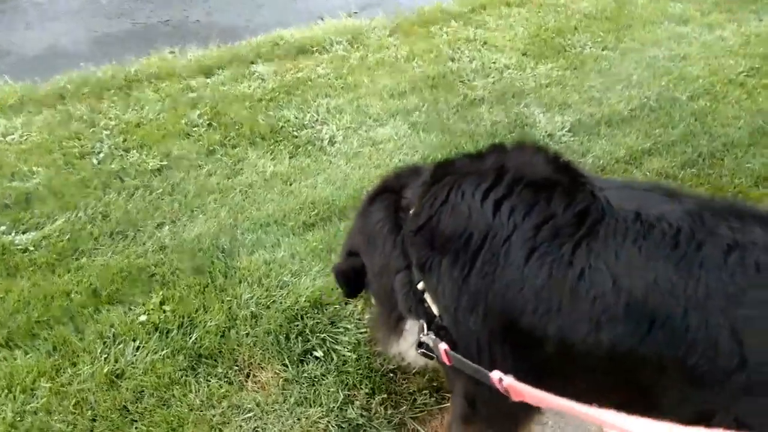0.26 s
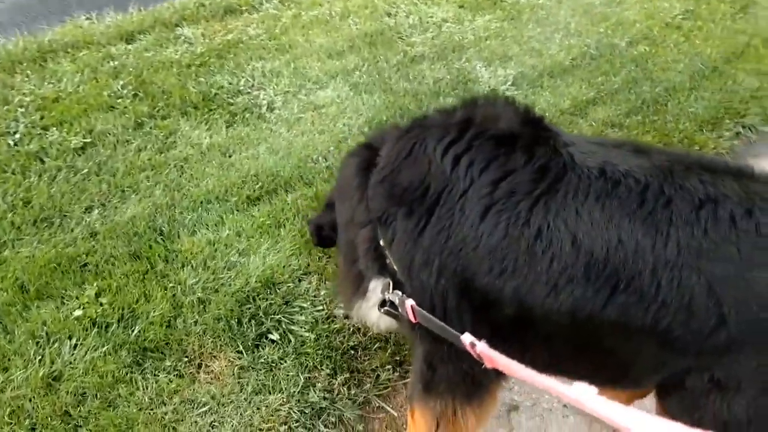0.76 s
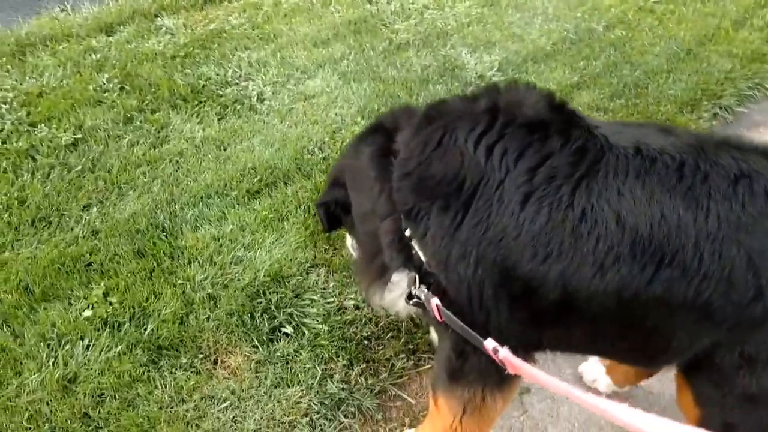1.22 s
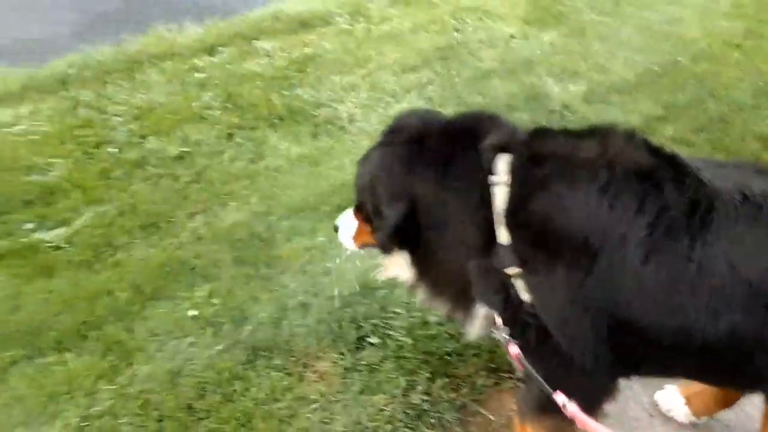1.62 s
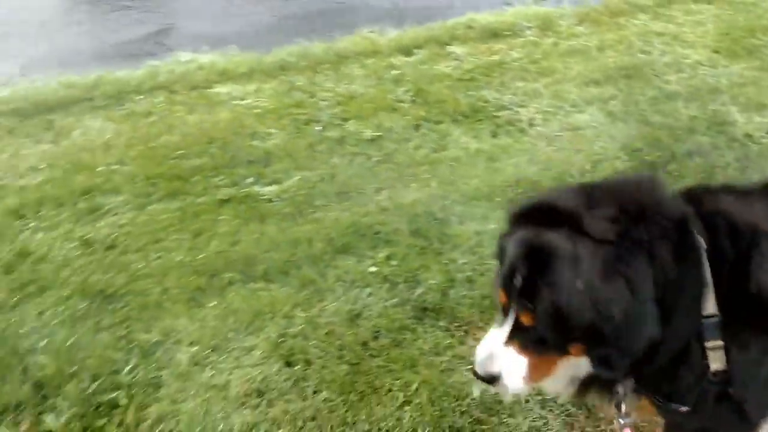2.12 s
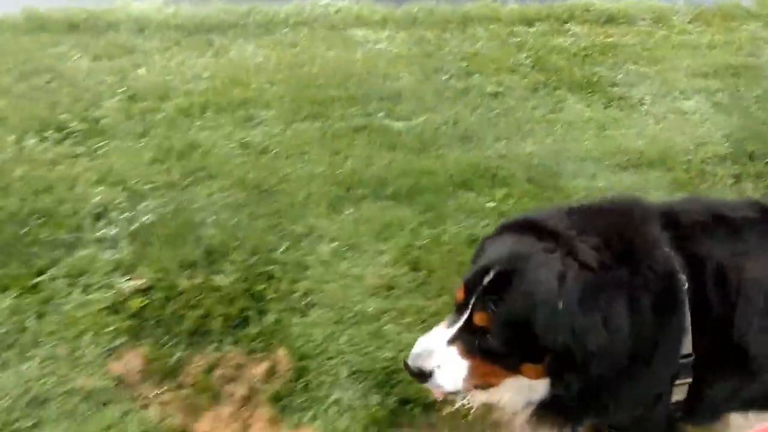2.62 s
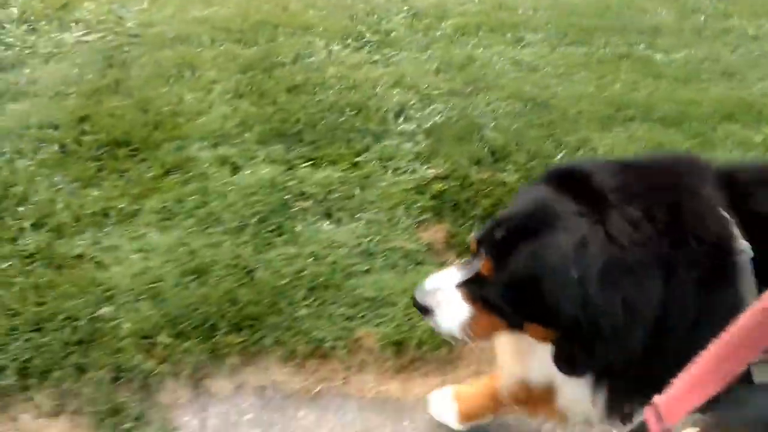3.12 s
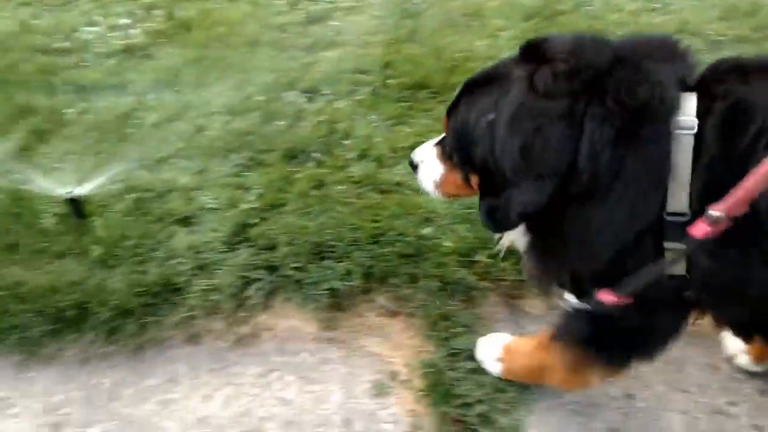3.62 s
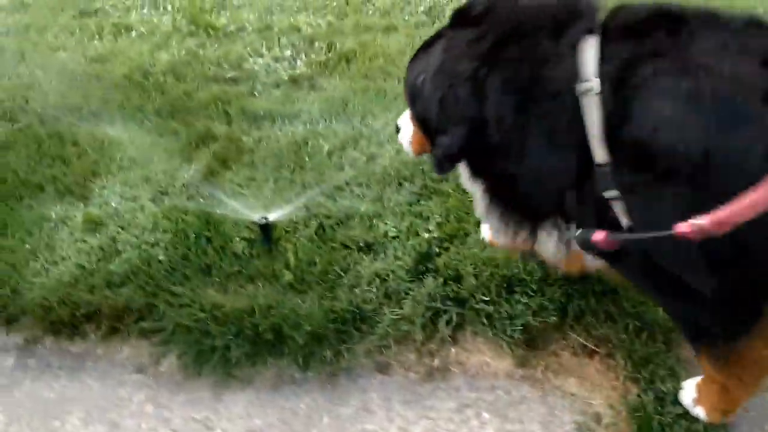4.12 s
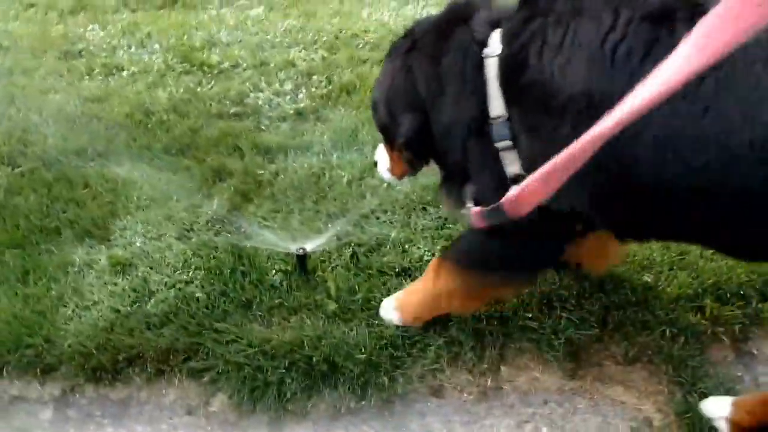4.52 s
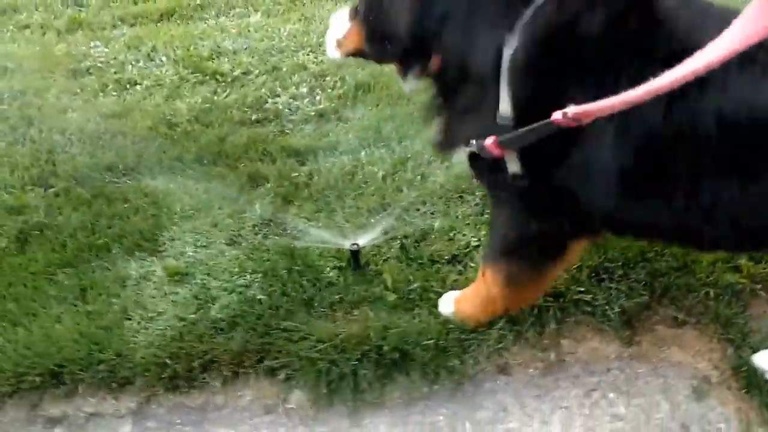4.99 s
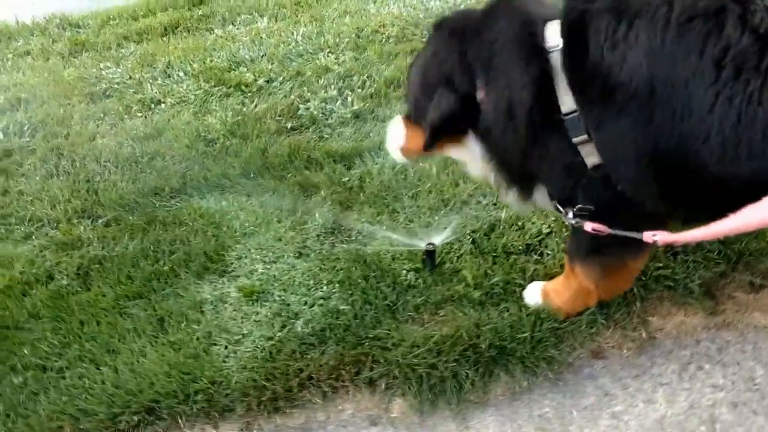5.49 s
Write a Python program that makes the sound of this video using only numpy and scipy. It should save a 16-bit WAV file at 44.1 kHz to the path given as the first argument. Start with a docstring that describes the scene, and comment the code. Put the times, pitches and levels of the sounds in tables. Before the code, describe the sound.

Outdoors on a lawn, sprinklers hiss and patter over a low, wide rumble. A dog laps and snaps at the water with wet plops, small bubbles and short splashes. The hand-held microphone moves towards one nozzle, so its hiss grows brighter and closer. Near the end the leash clip jingles and grates, a plastic buckle clacks, and a few dull paw falls land.

```python
"""Sprinklers hiss and patter on a lawn over a low outdoor rumble: filtered noise and random impulses.
A leashed dog laps and snaps at the spray: damped sines for plops, struck resonances for snaps.
The hand-held microphone nears one nozzle, so its hiss shifts in level and colour.
Near the end the leash clip clinks close by, as ringing modes and grating noise, and a buckle clacks.
Gain control ducks when the treble is loud and slowly recovers."""
import sys
import numpy as np
from scipy import signal
from scipy.fft import rfft, irfft, next_fast_len
from scipy.io import wavfile
from scipy.ndimage import uniform_filter1d, map_coordinates

SR = 44100
rng = np.random.default_rng(int(sys.argv[2]) if len(sys.argv) > 2 else 0)


def wrap_up_sound(samples):
    """Save the sound to the file named by the first command line argument, as 16-bit audio."""
    columns = np.atleast_2d(samples).T
    # keep every value between -1 and 1, then stretch to whole-number steps
    tamed = np.clip(columns, -1, 1)
    steps = np.round(tamed * 32767).astype(np.int16)
    wavfile.write(sys.argv[1], SR, steps)


N = 253575
TIME = np.arange(N) / SR  # s


def from_db(db):
    """Decibel law: amplitude gain from level."""
    return 10 ** (np.asarray(db) / 20)


def rms_one(x):
    """Power normalization: scale to rms 1."""
    return x / np.sqrt(np.mean(x ** 2) + 1e-20)


def in_time(rows):
    """Linear interpolation: each column of a curve at every sample."""
    times, *columns = np.transpose(rows)
    return [np.interp(TIME, times, column) for column in columns]


def add(out, s, sound):
    """Superposition: mix a sound in at time s."""
    start = max(round(s * SR), 0)
    out[..., start:start + sound.shape[-1]] += sound[..., :max(N - start, 0)]


def colour(x, spectrum):
    """Linear filtering: shape x by a spectrum in the frequency domain; rms 1."""
    hz, db = np.transpose(spectrum)
    size = next_fast_len(x.shape[-1])
    bins = np.maximum(np.fft.rfftfreq(size, 1 / SR), 1)
    # the response falls as f squared below the first point
    below = np.minimum(bins / hz[0], 1) ** 2
    gain = below * from_db(np.interp(np.log(bins), np.log(hz), db))
    shaped = irfft(rfft(x, size) * gain, size)
    return rms_one(shaped[..., :x.shape[-1]])


def drift(rate):
    """Slow random modulation: lines between chance knots, rate per second; rms 1."""
    knots = rng.standard_normal(2000)
    return rms_one(np.interp(TIME * rate, np.arange(len(knots)), knots))


def swell_at(s, half_s):
    """Gaussian envelope: a smooth rise and fall around time s; height 1."""
    return np.exp(-((TIME - s) / half_s) ** 2 / 2)


def approach(far, near):
    """Sigmoid transition: ease from far to near value as the microphone walks up to the nozzle."""
    middle_s, ease_s = 3.35, 0.32
    return far + (near - far) * (1 + np.tanh((TIME - middle_s) / ease_s / 2)) / 2


def resonate(x, hz, width_hz):
    """Two-pole resonance: the bandwidth sets the decay."""
    r = np.exp(-np.pi * width_hz / SR)
    return signal.lfilter([1, 0, -1], [1, -2 * r * np.cos(2 * np.pi * hz / SR), r * r], x)


def delayed(x, ms):
    """Propagation delay: read x a changing time late."""
    return map_coordinates(x, [np.arange(N) - ms * SR / 1000], order=3, mode="wrap")


def panned(x, pan_db):
    """Interchannel level difference: positive pan_db favours the left."""
    return x * from_db(np.reshape([pan_db / 2, -pan_db / 2], (2, -1)))


def left_right(mid, side):
    """Sum-difference decoding: mid and side to two channels."""
    return np.array([mid + side, mid - side])


def drops(per_s, spread_db, smooth_db):
    """Shot noise: near drops of uneven size over the smooth wash of countless far ones."""
    sizes = from_db(spread_db * np.minimum(rng.exponential(1, N), 4)) * rng.choice([-1, 1], N)
    near = rms_one(sizes * (rng.random(N) < per_s / SR))
    return rms_one(near + from_db(smooth_db) * rng.standard_normal(N))


def plop(hz, t60, rise):
    """Damped oscillation: a sine swells and dies, its pitch raised by the fraction rise; envelope height 1."""
    t = TIME[:SR // 10]
    age = t * np.log(1000) / max(t60, .002)
    pitch = hz * (1 + rise * np.minimum(t / t60, 1))
    envelope = age * np.exp(1 - age)
    return envelope * np.sin(2 * np.pi * np.cumsum(pitch) / SR)


# Rumble spectra of the channel sum and difference: [f/Hz, level/dB per Hz]
RUMBLE_SUM_SPECTRUM = [(25, -38), (38, -21), (55, -8), (85, -2.5), (160, -4), (185, 1), (220, -7),
                       (400, -10.5), (1000, -26)]
RUMBLE_DIFFERENCE_SPECTRUM = [(25, -17), (38, -10), (55, 14), (90, 0), (130, 10.5), (200, -4), (400, -3),
                              (900, -2.5)]


def rumble(mid_db=-1.0, side_db=11.5):
    """Low-frequency noise in near antiphase: steady outdoor rumble with one soft gust."""
    level_db = -52.5 + 5 * swell_at(2.95, half_s=0.38)
    mid, side = rng.standard_normal((2, N))
    mid = from_db(mid_db) * colour(mid, RUMBLE_SUM_SPECTRUM)
    side = from_db(side_db) * colour(side, RUMBLE_DIFFERENCE_SPECTRUM)
    return from_db(level_db) * left_right(mid, side)


# Drops landing on grass and soil: [f/Hz, level/dB per Hz]
PATTER_SPECTRUM = [(100, -1.5), (250, -3), (450, -1), (800, 0.5), (1200, -3.5), (1700, -6.5), (2400, -22.5),
                   (4000, -48), (9000, -16.5)]


def patter(level_db, mid_db=2.0, side_db=-5.5, flutter_db=1.23):
    """Impact noise: random drops land dully on grass and soil."""
    mid, side = (colour(drops(per_s=600, spread_db=4.0, smooth_db=2.5), PATTER_SPECTRUM) for _ in range(2))
    level = from_db(level_db + flutter_db * drift(25.024))
    return level * left_right(from_db(mid_db) * mid, from_db(side_db) * side)


# Fine spray: [f/Hz, level/dB per Hz]
MIST_SPECTRUM = [(1200, -23), (2300, -6), (3200, 5.5), (4300, 10.5), (5400, 6.5), (7500, -5), (11000, -19),
                 (13300, 0), (15500, 0)]


def mist(level_db, mid_db=5.5, side_db=-4.5, flutter_db=2.5):
    """Dense shot noise: fine spray from the heads all around."""
    mid, side = (colour(drops(per_s=3000, spread_db=2.0, smooth_db=4.5), MIST_SPECTRUM) for _ in range(2))
    level = from_db(level_db + flutter_db * drift(40))
    return level * left_right(from_db(mid_db) * mid, from_db(side_db) * side)


# Hiss level of the near nozzle: [t/s, level/dB]
NOZZLE_LEVEL = [(0.0, -43.5), (0.52, -41.5), (1.03, -45.5), (1.47, -40.5), (1.9, -42.5), (3.31, -39.5),
                (4.11, -37), (4.59, -36.5), (4.7, -37)]
# Hiss of the tearing water sheet: [f/Hz, level/dB per Hz]
NOZZLE_SPECTRUM = [(3000, 0), (6000, 1.5), (7600, 5), (9000, 2), (11500, 1.5), (15500, -2.5)]
# Bright bands that swell and fade as the microphone moves, relative to the hiss:
# [t at height/s, half length/s, f at height/Hz, slide/(Hz/s), width/Hz, level/dB, left-right/dB]
BRIGHT_BANDS = [(0.502, .6, 13400, 103, 1100, -18, -5), (1.5, 2.1, 9740, -79, 900, -19.5, 17),
                (2.1, 0.34, 13200, -1200, 900, -13, -10), (2.503, 0.46, 11750, -250, 800, -7, -2),
                (3.151, 0.47, 13950, -400, 1400, -7, 0), (3.344, 0.38, 11270, -900, 750, -6.5, 4),
                (3.7, 0.32, 9440, -600, 1100, -9.5, -6), (4.25, 0.39, 7940, -400, 850, -5.5, 10),
                (4.399, .35, 11040, 49.5, 700, -11.5, -9), (4.6, 0.42, 12850, 300.5, 1000, -9.5, -11),
                (5.199, 0.55, 8200, 50.5, 850, -15.5, 16)]


def nozzle(scatter_db=-2.5, flutter_db=.5, patchy_db=3.0, wander_hz=120):
    """Jet breakup noise: a water sheet tears into drops; patchy bright bands come and go in its hiss."""
    level_db, = in_time(NOZZLE_LEVEL)
    # the left port leads until the nozzle is in front
    lead_ms = approach(far=0.407, near=0)
    tearing = drops(per_s=10000, spread_db=6.5, smooth_db=-3.5)
    ports = np.array([tearing, delayed(tearing, lead_ms)])
    ports = ports + from_db(scatter_db) * rng.standard_normal((2, N))
    hiss = panned(colour(ports, NOZZLE_SPECTRUM), approach(far=10, near=1))
    for s, half_s, hz, slide, width_hz, db, pan_db in BRIGHT_BANDS:
        # low-passed noise on two quadrature carriers makes a gliding noise band
        narrow = signal.butter(2, width_hz / 2, fs=SR, output="sos")
        centre_hz = hz + slide * (TIME - s) + wander_hz * drift(6.5)
        phase = 2 * np.pi * np.cumsum(centre_hz) / SR
        a, b = signal.sosfilt(narrow, rng.standard_normal((2, 2, N)))
        band = rms_one(a * np.cos(phase) + b * np.sin(phase))
        band_level = from_db(db + patchy_db * drift(11)) * swell_at(s, half_s)
        hiss = hiss + panned(band_level * band, pan_db)
    return hiss * from_db(level_db + flutter_db * drift(40))


def close_patter(far_db=-66, near_db=-48.5, hz=1230, width_hz=700, side_db=-6, pan_db=3.0):
    """Resonant impacts: drops tick on blades near the head, louder as the microphone comes closer."""
    ticks = (resonate(drops(per_s=770, spread_db=6.5, smooth_db=-1.5), hz, width_hz) for _ in range(2))
    mid, side = (rms_one(resonate(x, hz, width_hz)) for x in ticks)
    return from_db(approach(far_db, near_db)) * panned(left_right(mid, from_db(side_db) * side), pan_db)


# Soft paw falls on wet turf: [t/s, peak level/dB, f/Hz]
PAW_FALLS = [(0.106, -36.5, 302), (3.658, -36, 380), (4.389, -32.5, 350), (4.918, -31, 306),
             (5.019, -31, 298), (5.121, -29, 254)]


def steps(ring_cycles=3.5):
    """Heavily damped impact: each paw lands with a short, dull pat."""
    out = np.zeros((2, N))
    for s, db, hz in PAW_FALLS:
        add(out, s, from_db(db) * plop(hz, ring_cycles / hz, rise=0))
    return out


# Tongue and jaw in the water:
# [t/s, plop level/dB, plop f/Hz, ring/cycles, snap level/dB, snap centre f/Hz]
TONGUE_AND_JAW = [(.371, -38, 600, 9.9, -51, 1500), (.427, -40, 920, 27, -45, 1500),
                  (.469, -36, 1100, 18, -33, 1500), (.483, -38, 1090, 18, -42, 1500),
                  (.642, -30.5, 530, 6.7, -44, 1500), (.671, -46, 830, 12, -44, 1500),
                  (.754, -32.5, 654, 10.5, -38, 1500), (.993, -34, 760, 12, -25.5, 1500),
                  (1.043, -24.5, 710, 9.5, -39, 1500), (1.071, -48, 1500, 4, -27, 3300),
                  (1.172, -25, 800, 2, -21.5, 1500), (1.21, -21, 1410, 3.8, -21.5, 1500),
                  (1.271, -33.5, 427, 7.6, -22, 1500), (1.335, -33, 320, 3.4, -38, 1500),
                  (1.472, -37, 1820, 14, -35, 1700), (1.548, -37, 1210, 16, -32, 1500),
                  (1.7015, -17.5, 883, 11, -27, 1500), (2.017, -36, 2760, 26, -33, 2800),
                  (2.033, -27.5, 1130, 10.4, -21, 1600), (2.039, -34, 990, 10, -28, 1700),
                  (2.163, -17.5, 626, 1.45, -26, 2900), (2.375, -29.5, 1420, 31, -24, 1800),
                  (2.631, -25, 485, 7.4, -26.5, 1500), (2.705, -27.5, 513, 8.6, -48, 1500),
                  (2.752, -31, 377, 6.5, -44, 1500), (2.795, -29.5, 840, 6.9, -26, 1500),
                  (3.607, -31, 1690, 13, -40, 1700), (4.11, -23, 624, 4.1, -22, 2900),
                  (4.4134, -17.5, 1330, 4, -30, 1700), (4.4161, -22.5, 1170, 4.8, -21, 1500),
                  (4.4423, -29, 880, 5.4, -20, 2300), (4.783, -29, 630, 13, -19, 1400),
                  (4.838, -27.5, 534, 4.6, -19.5, 1400), (4.863, -24, 1410, 13, -24, 2200),
                  (4.882, -19.5, 1700, 13.5, -17.5, 1830), (5.01, -29.5, 660, 13, -13, 1680),
                  (5.192, -27, 930, 3.7, -32, 3000), (5.7108, -19.5, 750, 3.3, -21, 1100),
                  (5.715, -31, 474, 2.1, -30, 1110)]


def laps(rise=0.087, snap_width_hz=1500, wet_db=-7.5, wet_decay_s=.0035, pan_db=-2.0):
    """Impulse and cavity resonance: a snap with a wet tail, and a plop as a pocket of air closes."""
    out, t = np.zeros((2, N)), TIME[:SR // 10]
    for s, db, hz, cycles, snap_db, snap_hz in TONGUE_AND_JAW:
        crack = resonate(signal.unit_impulse(len(t)), snap_hz, snap_width_hz)
        wet = rms_one(resonate(rng.standard_normal((2, len(t))), snap_hz, snap_width_hz))
        wet = wet * np.exp(-t / wet_decay_s)
        snap = crack / np.max(np.abs(crack)) + from_db(wet_db) * wet
        cavity = plop(hz, cycles / hz, rise)
        add(out, s, from_db(db) * cavity + from_db(snap_db) * snap)
    return panned(out, pan_db)


# Runs of small bubbles: [t/s, length/s, middle f/Hz, climb/(octaves/s), level/dB]
BUBBLE_RUNS = [(0.373, 0.12, 860, 9, -48.5), (0.668, 0.045, 740, -2, -44), (0.687, 0.068, 1060, 2, -51.5),
               (0.941, 0.07, 716, 2, -43.5), (0.999, 0.039, 1420, -1, -47), (1.625, 0.023, 1060, -8, -42.5),
               (2.319, 0.036, 540, 11, -41.5), (2.364, 0.042, 483, -7, -45)]


def slurps(per_s=260, scatter=0.14, t60=0.011, pan_db=4.0):
    """Bubble resonance: slurped bubbles shift in pitch as the mouth's hollow shrinks or widens."""
    out = np.zeros(N)
    for s, length, middle_hz, climb, db in BUBBLE_RUNS:
        run, chance = np.zeros(N // 8), rng.standard_normal((200, 3))
        count = int(np.clip(per_s * length, 2, len(chance)))
        for k, (early, detune, size) in enumerate(chance[:count]):
            age = length * (k + early / 2) / count
            hz = middle_hz * 2 ** (climb * (age - length / 2)) * np.exp(scatter * detune)
            add(run, age, np.exp(size / 2) * plop(hz, t60, rise=0.046))
        run_rms = np.sqrt(np.sum(run ** 2) / (length * SR))
        add(out, s, from_db(db) * run / run_rms)
    return panned(out, pan_db)


# Jet on the muzzle: [start t/s, length/s, level/dB]
MUZZLE_SPLASHES = [(0.548, 0.093, -38.5), (0.784, 0.034, -36), (1.192, 0.1, -33.5), (1.23, 0.016, -34),
                   (1.524, 0.12, -37), (3.548, 0.006, -31)]
# Bright splatter: [f/Hz, level/dB per Hz]
SPLATTER_SPECTRUM = [(1500, -0.5), (3000, -3.5), (4700, 10.5), (5500, 9), (6500, 0), (8000, 0), (10000, -8),
                     (15500, -22)]


def splashes(attack_s=0.0056, release_s=0.0076):
    """Gated impact noise: bright splatter rises, holds and decays as the muzzle crosses the jet."""
    level = np.zeros(N)
    for s, length, db in MUZZLE_SPLASHES:
        attack = np.clip((TIME - s) / attack_s, 0, 1)
        release = np.exp(-np.maximum(TIME - s - length, 0) / release_s)
        level += from_db(db) * attack * release
    spray = np.array([drops(per_s=750, spread_db=-0.5, smooth_db=-0.5) for _ in range(2)])
    return level * colour(spray, SPLATTER_SPECTRUM)


# Low thuds, mostly opposite in the two ports; the first one comes with the lap at 2.16 s: # [t/s, peak level of
# the difference/dB, f/Hz, ring/cycles]
LOW_THUDS = [(2.1646, -14.5, 350, 2.1), (2.4013, -19, 320, 2), (2.993, -31, 80, 3.8),
             (3.081, -15.5, 112, 3.5), (5.692, -21, 320, 2.3)]


def bumps(common=0.15):
    """Damped oscillation in near antiphase: low thuds, mostly opposite left and right; one comes with a lap."""
    side = np.zeros(N)
    for s, db, hz, cycles in LOW_THUDS:
        add(side, s, from_db(db) * plop(hz, cycles / hz, rise=0))
    return left_right(common * side, side)


def struck(modes, t):
    """Modal superposition: metal rings differently at each blow and port; rms 1 over the first 5 ms."""
    ring = 0
    for hz, db, t60 in modes:
        strength, detune, turn = rng.standard_normal((3, 2, 1))
        tone = np.sin(2 * np.pi * (hz * (1 + .004 * detune) * t + turn))
        ring = ring + from_db(db + 2 * strength - 60 * t / t60) * tone
    return ring / np.sqrt(np.mean(ring[:, :SR // 200] ** 2))


# Blows of the leash clip:
# [t/s, ring level/dB, hook level/dB, rattle level/dB, rattle tilt/(dB/octave), hook slide/s]
CLIP_BLOWS = [(4.797, -42, -34, -26, -3, .006), (4.803, -22, -18, -16, -2, 0.0031),
              (4.838, -44, -38, -22, 2, .0037), (4.863, -44, -44, -19.5, -5, 0.0035),
              (4.887, -32, -44, -36, .5, .003), (4.915, -44, -25, -29, -1, 0.0054),
              (4.945, -30, -27, -26, 2.5, .005), (4.956, -38, -32, -29, 3, .0041),
              (4.967, -18.5, -19.5, -23, -3, .0059), (4.979, -41, -38, -18, -2.5, 0.01),
              (4.9935, -38, -38, -17, -3, .0024), (5.057, -40, -44, -21, 1, 0.0017),
              (5.067, -24, -33, -31, -6, .0051), (5.129, -37.5, -33, -30, -6, .0055),
              (5.139, -28, -35, -27, -6, .002), (5.197, -33, -29, -11.5, -1, 0.0075),
              (5.2065, -30, -16, -13, 3, .002), (5.654, -40, -26, -17.5, -4.5, 0.011),
              (5.672, -17, -29, -23, 0, .005), (5.733, -34, -42, -32, .5, 0.002),
              (5.745, -38, -40, -26, -3, 0.0045)]
# Mean modes of the metal ring and the hook: [f/Hz, level/dB, t60/s]
METAL_RING_MODES = [(6250, -11, .03), (8400, -11, .035), (10480, -1, .025), (11900, -1, .045),
                    (12080, -3, .04)]
SNAP_HOOK_MODES = [(14650, -3, .04), (14950, 0, .05)]
# Grating of hook in ring, before the tilt: [f/Hz, level/dB per Hz]
GRATING_SPECTRUM = [(600, -0.5), (1800, -8), (2700, 2.5), (4500, 14.5), (6200, 10), (8400, 6), (10500, 10),
                    (13000, 11), (14700, 21.5), (16000, 10.5)]


def leash_clip(swell_s=0.0028, tail_s=0.0048):
    """Friction and modal ringing: the snap hook grates briefly in its ring, then both ring on."""
    out, t = np.zeros((2, N)), TIME[:SR // 8]
    for s, ring_db, hook_db, rattle_db, tilt_db, length in CLIP_BLOWS:
        ring = from_db(ring_db) * struck(METAL_RING_MODES, t)
        hook = from_db(hook_db) * struck(SNAP_HOOK_MODES, t)
        # many tiny uneven contacts while the hook slides
        contacts = rng.standard_normal((2, len(t))) * from_db(0.76 * rng.standard_normal(len(t)))
        spectrum = [(hz, db + tilt_db * np.log2(hz)) for hz, db in GRATING_SPECTRUM]
        decay = np.exp(-np.maximum(t - length - swell_s, 0) / tail_s - t / length / 2)
        rattle = from_db(rattle_db) * colour(contacts, spectrum) * decay
        swell = 1 - np.exp(-(t / swell_s) ** 2)
        add(out, s - swell_s / 2, swell * (ring + hook + rattle))
    return out


def buckle(s=4.797, level_db=-11.5, hz=3070, width_hz=1800, decay_s=0.0049):
    """Damped broad resonance: the plastic harness buckle clacks once as the leash pulls tight."""
    out, t = np.zeros((2, N)), TIME[:SR // 10]
    body = rms_one(resonate(rng.standard_normal((2, len(t))), hz, width_hz))
    add(out, s, from_db(level_db) * body * np.exp(-t / decay_s))
    return out


# Treble lift of the left and right port, one row each: [f/Hz, width/Hz, lift/dB]
PORT_RESONANCES = [(8040, 1700, 8.5), (11700, 2400, 3)]


def close_by(x):
    """Port resonance: each port lifts its own treble band in sounds from close by."""
    lifted = []
    for port, (hz, width_hz, db) in zip(x, PORT_RESONANCES):
        band = signal.lfilter(*signal.iirpeak(hz, hz / width_hz, fs=SR), port)
        lifted.append(port + (from_db(db) - 1) * band)
    return np.array(lifted)


# Water all around: [t/s, patter level/dB, mist level/dB]
LAWN_LEVELS = [(0.0, -46.5, -48.5), (0.85, -49, -46), (1.36, -47.5, -43.5), (1.99, -45, -48),
               (2.6, -47, -49), (3.0, -45.5, -41.5), (3.45, -46.5, -46), (3.65, -45, -48.5),
               (4.15, -45, -46), (4.57, -46, -46), (4.7, -44, -46), (5.4, -43.5, -46.5)]


def scene():
    """Superposition of sources: sprinklers, dog and leash in the open air."""
    patter_db, mist_db = in_time(LAWN_LEVELS)
    water = panned(patter(patter_db), pan_db=2.2) + mist(mist_db) + nozzle() + close_patter()
    dog = steps() + laps() + slurps() + splashes()
    leash = close_by(leash_clip() + buckle())
    return rumble() + water + dog + bumps() + leash


def notched(x, notches, shift, breadth, size=256):
    """Band rejection: a chain of moving cuts, each passed twice, stepped block by block."""
    sections = []
    for hz, width_hz, depth_db in notches:
        middle = -2 * np.cos(2 * np.pi * hz * shift[::size] / SR)
        left = from_db(np.broadcast_to(depth_db, N)[::size])  # gain left at the centre
        half = np.tan(np.pi * width_hz * breadth[::size] / SR)
        section = np.array([1 + half * left, middle, 1 - half * left, 1 + half, middle, 1 - half])
        sections += [section / (1 + half)] * 2
    out, state = np.zeros(N), np.zeros((len(sections), 2))
    for start, sos in zip(range(0, N, size), np.moveaxis(sections, -1, 0)):
        block = slice(start, start + size)
        out[block], state = signal.sosfilt(sos.copy(), x[block], zi=state)
    return out


def gain_control(x, limit_db=-28.0, sense_hz=3000, release_db_per_s=11, attack_s=.004):
    """Dynamic range compression: loud treble pulls the gain down quickly; it creeps back."""
    treble = signal.sosfilt(signal.butter(2, sense_hz, "high", fs=SR, output="sos"), x)
    power = np.abs(uniform_filter1d(np.mean(treble ** 2, axis=0), size=220))
    level_db = 10 * np.log10(power + 1e-12)
    # a running maximum holds each cut, less the steady recovery
    recovery = release_db_per_s * TIME
    cut_db = np.maximum.accumulate(np.maximum(level_db - limit_db, 0) + recovery) - recovery
    r = np.exp(-1 / (attack_s * SR))
    return x * from_db(-signal.lfilter([1 - r], [1, -r], cut_db))


# Narrow bands missing from sum and difference, interleaved as by stereo widening,
# before the factors over time: [f/Hz, width/Hz, depth per pass/dB]
SUM_NOTCHES = [(2088, 185, -18), (2194, 298, -15), (4116, 930, -36), (4363, 646, -36)]
DIFFERENCE_NOTCHES = [(1054, 550, -9), (3080, 650, -22), (3330, 480, -18), (5070, 750, -16),
                      (5230, 490, -16), (7460, 730, -3.5)]
# Notch settings over time: shift, width, depth of the top notch
# [t/s, factor on f, factor on width, depth per pass of the sum's top notch/dB]
NOTCH_COURSE = [(0.4, 0.99, 1.24, -10), (0.7, 1, 0.94, -1), (1.2, 1.004, 1.26, -3.5), (1.7, 1, 1.18, -3),
                (1.85, 1.002, 1.25, -22), (2.72, 1, 1.12, -7), (2.88, 1.016, 1.27, -2),
                (3.15, 1.05, 1.6, -2), (3.3, 1.037, 0.86, -9), (3.52, 1.01, 1.2, -5.5),
                (3.67, 1.003, 1.24, -1.5), (3.82, 1.016, 1.04, -28), (4.3, 1.03, 1.18, -17),
                (4.7, 1.025, 0.93, -6), (5.2, 1.028, 0.76, -1), (5.5, 1.034, 1.2, -20)]


def record(dry, low_cut_hz=48, top_cut_hz=15530):
    """Recording chain: low cut, stereo-widening notches, gain control and a steep top cut."""
    left, right = signal.sosfilt(signal.butter(4, low_cut_hz, "high", fs=SR, output="sos"), dry)
    shift, breadth, top_db = in_time(NOTCH_COURSE)
    top_notch = (6360, 955, top_db)  # f/Hz and width/Hz before the factors, depth per pass/dB
    mid = notched((left + right) / 2, [*SUM_NOTCHES, top_notch], shift, breadth)
    side = notched((left - right) / 2, DIFFERENCE_NOTCHES, shift, breadth)
    heard = gain_control(left_right(mid, side))
    return signal.sosfilt(signal.ellip(12, .2, 75, top_cut_hz, fs=SR, output="sos"), heard)


dry = scene()
out = record(dry)
wrap_up_sound(out)
```